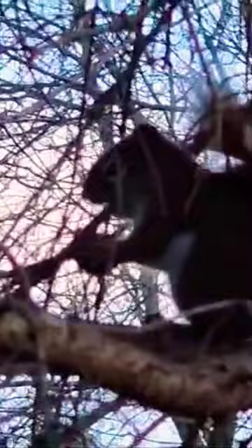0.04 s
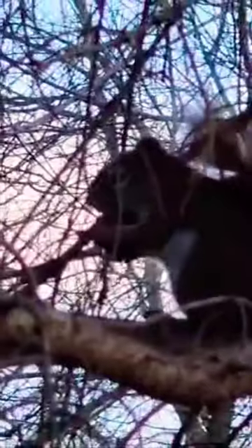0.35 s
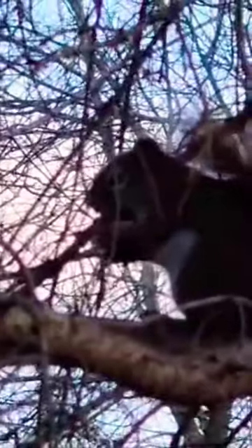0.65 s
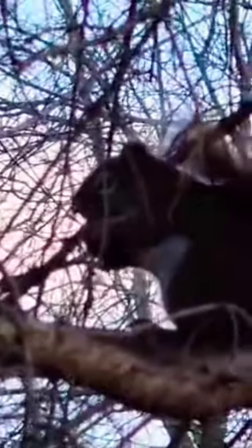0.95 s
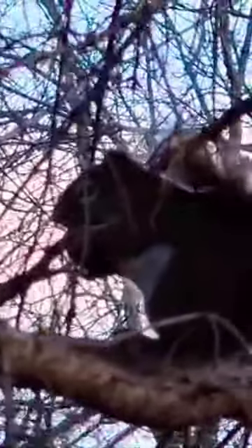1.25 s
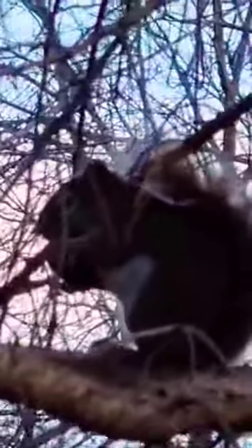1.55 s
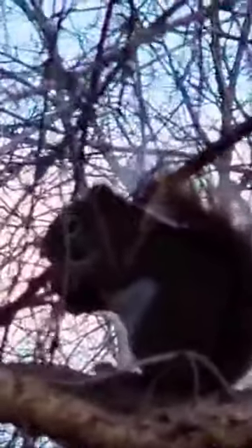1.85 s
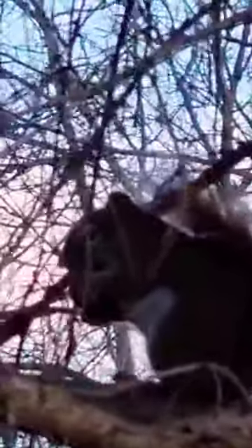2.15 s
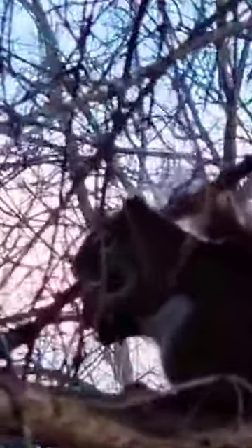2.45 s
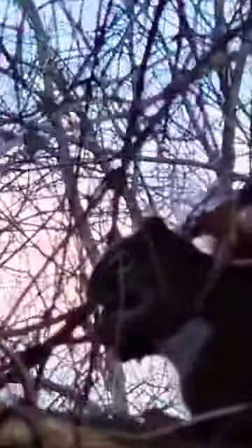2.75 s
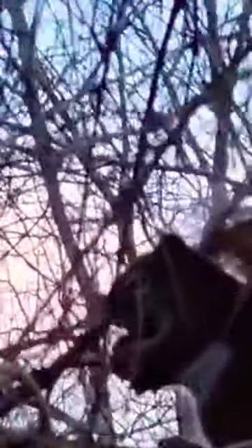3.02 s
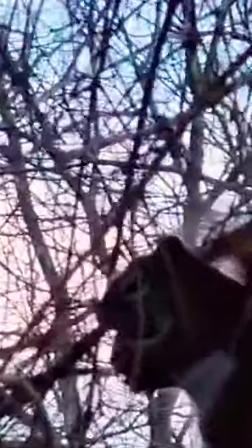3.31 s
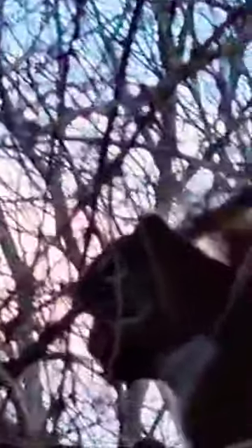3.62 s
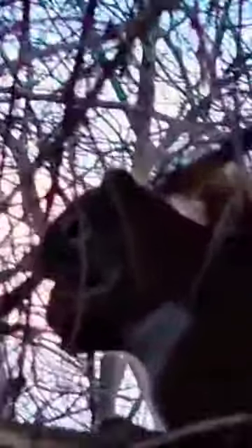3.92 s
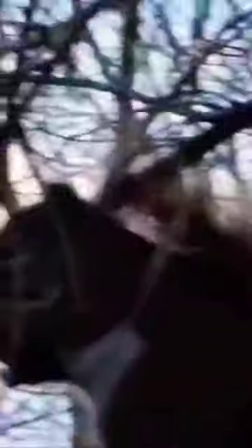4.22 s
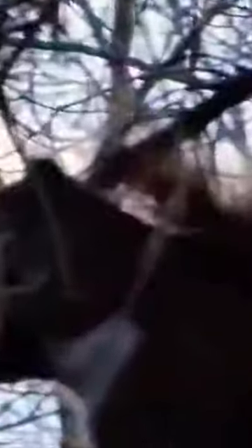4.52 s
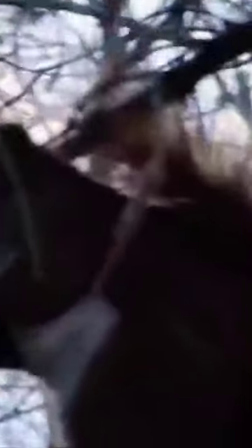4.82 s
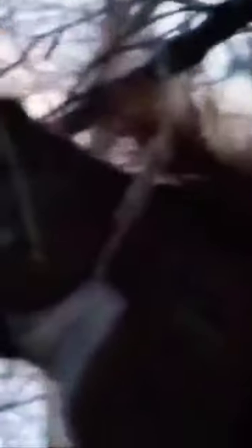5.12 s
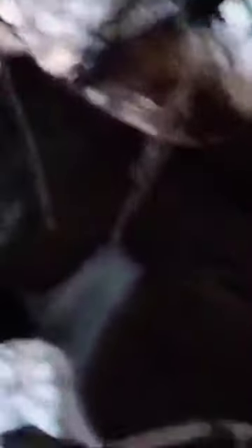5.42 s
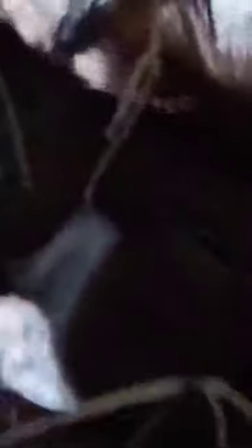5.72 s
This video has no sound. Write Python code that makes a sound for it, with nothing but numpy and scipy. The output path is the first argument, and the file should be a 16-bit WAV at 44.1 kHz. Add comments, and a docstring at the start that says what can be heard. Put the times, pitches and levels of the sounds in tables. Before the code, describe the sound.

Distant road traffic rumbles throughout, slightly to the left, slowly growing under a faint airy hiss. Off to the right, a small bird gives short, thin, high calls that echo among trees at about 0.5, 1.1 and 1.5 seconds; far birds tweet faintly. Close to the microphone, a squirrel gnaws a nut: a tick at 0.6 seconds, a dull knock at 1.2, then sharp, slightly hollow shell snaps with small tooth scrapes from 1.7 to 2.4, loudest around 2.1. The traffic swells between 2.5 and 3 seconds, with a faint sinking whine and drone. A soft scrape and slight rustle come near 3. The bird calls again at 3.4 and 3.8. From 4.5 to 5.5 seconds the squirrel gnaws in a denser run, about ten crisp rasping bites a second. The rumble swells briefly near 5.2, and a last bird call follows at 5.5.

```python
"""Far road traffic rumbles, slowly growing, with a few swells and a faint sinking whine and drone.
Over it a small bird repeats a thin call, two voices of its syrinx, that lingers among bare trees;
far birds tweet and the air hisses faintly. Close by, a squirrel gnaws a nut on a branch in two bouts:
its incisors scrape and catch on the shell and snap off chips, and the hollow nut rings."""
import sys
import numpy as np
from scipy import signal
from scipy.fft import rfft, irfft, next_fast_len
from scipy.io import wavfile

SR = 44100
rng = np.random.default_rng(int(sys.argv[2]) if len(sys.argv) > 2 else 0)


def dump_mix(stems):
    """Bounce the given channels to the path in sys.argv[1] as a 16-bit WAV at rate SR."""
    frames = np.atleast_2d(stems).T  # one column per channel
    limited = np.clip(frames, -1, 1)  # hard clip at full scale
    pcm = np.round(limited * 32767).astype(np.int16)
    wavfile.write(sys.argv[1], SR, pcm)


N = 258426
TIME_S = np.arange(N) / SR
N_FFT = next_fast_len(N + SR // 10, True)
BINS_HZ = np.fft.rfftfreq(N_FFT, 1 / SR)

# far sound at the two ears: freq_hz, coherence, left_lead_rad
EAR_COHERENCE = [(30, 0.86, 0), (90, 1, 0), (169, 0.98, 0.2), (340, 0.84, 0.68), (680, 0.3, 0.72),
                 (900, 0.7, 1.68), (1410, 0.5, 2), (2160, 0.2, 3.5), (5000, 0.15, -2)]
# air hiss: freq_hz, density_db
AIR_SPECTRUM = [(2000, -2), (4000, 3), (8500, -2.5), (10000, -9), (15500, -1.5), (17000, -25.5)]
# air hiss: time_s, level_db
AIR_LEVEL = [(0, -75.5), (1.6, -78), (2.6, -75.5), (3.1, -74.5), (3.6, -77.5), (4.4, -77.5), (5.6, -70)]
# thin rustle: freq_hz, density_db
RUSTLE_SPECTRUM = [(3000, -3.5), (7000, -7.5), (12000, -1.5), (15500, -1.5)]
# thin rustle: time_s, level_db
RUSTLE_LEVEL = [(2.4, -97), (2.75, -80), (2.93, -77), (3.0, -75), (3.12, -79.5), (3.6, -90)]

# engine rumble: freq_hz, density_db
RUMBLE_SPECTRUM = [(12, -57.5), (20, -20.5), (54, -9.5), (81, 0), (97, 2), (124, 0), (141, -6.5),
                   (166, -17), (201, -15), (260, -21), (340, -67), (570, -120)]
# tyre roar: freq_hz, density_db
ROAR_SPECTRUM = [(150, -18), (220, -5.5), (260, -4.5), (315, 2.5), (370, -1.5), (450, -1), (530, -5),
                 (620, -5), (750, -8.5), (950, -11), (1400, -30)]
# tyre hiss: freq_hz, density_db
HISS_SPECTRUM = [(600, -23), (900, 3), (1400, 2.5), (2000, -7), (3000, -17.5), (4500, -30), (7000, -47.5),
                 (10000, -36.5)]
# swells in the traffic's rumble, roar and hiss: peak_s, half_amplitude_s, rumble_db, roar_db, hiss_db
SWELLS = [(2.56, 0.2, -38, -42.5, -61), (2.88, 0.19, -29.5, -43.5, -59), (5.18, -0.08, -22.5, -53.5, -59),
          (5.82, 0.35, -38.5, -48.5, -53.5)]
# vehicle whine: time_s, level_db
WHINE_LEVEL = [(0, -65.5), (1.901, -61.5), (2.2, -54), (2.5, -51), (3.301, -61.5), (3.95, -52), (4.3, -62)]
# engine drone: time_s, level_db
DRONE_LEVEL = [(0, -64.5), (2.0, -62.5), (2.55, -47.5), (3.4, -48), (4.3, -48.5), (5.2, -49)]

# blurred far song dying away: time_s, level_db
FAR_SONG_LEVEL = [(0, -65), (.33, -65.5), (.55, -74), (1.0, -99)]
# blurred far song: freq_hz, density_db
FAR_SONG_SPECTRUM = [(1700, -9), (2200, -6), (2550, -7), (2850, -0.5), (3150, -11), (4000, -12.5)]
# one far bird's falling tweets: start_s, gain_db
TWEETS = [(0.791, -68), (1.04, -61), (1.292, -64), (1.805, -67), (2.068, -67), (2.585, -67.5), (4.675, -68),
          (5.18, -67)]
# another far bird's high notes: start_s, length_s, from_hz, to_hz, gain_db
HIGH_NOTES = [(.01, 0.05, 4630, 4900, -69), (.093, 0.026, 6350, 5660, -67.5),
              (.128, 0.017, 4410, 5550, -63), (.418, 0.021, 5150, 5430, -70),
              (1.821, 0.023, 4350, 5840, -62.5), (1.7, .012, 5160, 4480, -61)]
# small bird's calls: start_s, whistle_hz, whistle_db, accent_db, upsweep_db, chip_hz, chip_db
CALLS = [(0.539, 4196, -48.5, 11.5, -44, 5400, -57), (1.062, 3980, -53.5, 0.5, -66, 4590, -59.5),
         (1.479, 4050, -58, 3, -72, 4490, -57.5), (3.402, 3973, -53.5, -4, -60, 4700, -52.5),
         (3.459, 4194, -48.5, 11.5, -52, 5380, -65), (3.812, 4080, -55, 5.5, -69, 4490, -57.5),
         (5.536, 4020, -50.5, -2, -64, 4390, -54)]
# voice that holds, then drops: call_fraction, whistle_pitch_ratio, gain_db
WHISTLE = [(.1, .56, -24), (.2, .85, -16), (.27, 1, -6), (.33, 1.014, -1), (.42, .997, 0), (.58, .997, 0),
           (.68, .985, -2), (.74, .94, -10), (.78, .87, -11), (.84, .83, -11), (.88, .67, -13),
           (.93, .57, -6.5), (1, .53, -15)]
# voice that sweeps up: call_fraction, whistle_pitch_ratio, gain_db
UPSWEEP = [(0, .9, -30), (.09, 1.02, -12), (.16, 1.3, 0), (.22, 1.5, -12), (.28, 1.59, -12),
           (.38, 1.62, -11), (.58, 1.69, -18), (1, 1.69, -50)]
# the wood's echoes of a call: freq_hz, early_db, late_db
WOOD_RESPONSE = [(2400, 10.5, 0), (3000, 15, 9), (3650, 5, -2.5), (4230, 3, -3.5), (5500, -3, -12.5),
                 (7000, -2.5, -15)]

# modes of the scraped shell: freq_hz, width_hz, gain_db
SHELL_MODES = [(1490, 350, -3), (2250, 330, 2), (3480, 240, -4), (4700, 970, -6), (4750, 380, -3),
               (7800, 5100, -23)]
# tooth strokes and light paw rubs: middle_s, length_s, gain_db, rasp_fraction
STROKES = [(0.84, 0.019, -70, 0.6), (1.249, 0.047, -59.5, 0.34), (1.71, 0.036, -56, 0.4),
           (1.857, .02, -55.5, 0.3), (1.979, 0.016, -63, 0.75), (2.112, 0.047, -55.5, 0.6),
           (2.218, 0.039, -55.5, 0.88), (2.323, 0.039, -58, 0.64), (2.438, 0.029, -62, 0.45),
           (2.993, 0.083, -64, 0.67), (4.531, 0.059, -53.5, 0.46), (4.619, .03, -58, 0.8),
           (4.719, 0.026, -55, 0.84), (4.809, 0.028, -55, 0.64), (4.921, 0.033, -51, 0.5),
           (5.029, 0.039, -56.5, 0.88), (5.224, 0.039, -54, 0.18), (5.327, 0.047, -56.5, 0.32),
           (5.418, 0.041, -55.5, 0.94), (5.448, 0.017, -58, 0.5)]
# an incisor catches and slips: start_s, peak_db
CATCHES = [(.637, -48), (2.099, -48), (2.103, -46), (2.3108, -46.5), (2.316, -40), (4.5035, -47),
           (4.6115, -45), (4.721, -43), (4.803, -46), (4.9052, -42), (5.0203, -48), (5.0227, -41.5),
           (5.0345, -45), (5.0385, -41), (5.206, -49), (5.2218, -38), (5.4108, -40), (5.4168, -50),
           (5.4216, -44), (5.4267, -41)]
# nut knocks on the teeth: time_s, gain_db
KNOCKS = [(1.2024, -33)]
# shell fractures: start_s, gain_db, chip_hz, hollow_hz, hollow_db, overtone_db, edge_db
SNAPS = [(1.713, -21.5, 4600, 2920, 1, -15, -16), (1.8659, -22.5, 3830, 2630, 1.5, -10.5, -15),
         (1.8664, -29, 5200, 2440, -1, -9, -11), (2.115, -18, 4700, 2930, -12.5, -6, -13),
         (1.243, -44, 6260, 2200, -8, -3.5, -25.5), (2.214, -48.5, 4200, 2270, 0, -14, -29),
         (2.231, -38.5, 4840, 2250, -3.5, -11, -23), (2.333, -23.5, 4700, 3540, -15, -12, -28.5),
         (2.437, -37, 4520, 2290, -6, -5, -16.5), (2.966, -46, 4370, 3430, -10.5, -20, -26),
         (4.5157, -40, 4550, 2160, -1, -6.5, -13), (4.53, -29.5, 4470, 2150, -10, -1.5, -17),
         (4.5367, -31.5, 4685, 2150, -13.5, -3, -19), (4.5554, -28, 4770, 3500, -14, -11, -17.5),
         (4.6293, -39, 4705, 2100, -7, -19, -20), (4.7141, -47, 4860, 2080, 4, -19, -27.5),
         (4.72, -46, 4910, 2097, -1, -11, -19), (4.8067, -47, 4400, 2050, -4, -2.5, -18),
         (4.8137, -38, 4410, 2050, -4, -4.5, -20), (4.9099, -40, 4400, 2080, 3.5, -18, -29),
         (4.9182, -31.5, 4540, 2100, -5, -2, -9.5), (4.924, -40, 4500, 2100, -8, -4, -11),
         (5.145, -54, 4720, 2100, -7, -18, -26), (5.2192, -28.5, 5200, 2706, -7, 1, -12.5),
         (5.225, -32.5, 4930, 2720, -2, -8, -15), (5.316, -36.5, 4350, 2000, -1, -6, -15),
         (5.3282, -28.5, 4470, 2020, 2, -8, -19), (5.3325, -40, 4230, 2000, 3, -12, -21),
         (5.4539, -30.5, 6250, 2200, -11, -10, -27)]
# phase between the ears for the nut: freq_hz, left_lead_rad
NUT_LEAD = [(1000, .1), (4500, 0.5), (6500, 1.6), (7800, 2.5), (9300, 5.1), (10200, 2.6), (15000, 6.3)]
# scatter off the twigs: freq_hz, gain_db
TWIG_RESPONSE = [(1000, 13), (2000, 7.5), (2700, 7), (4800, -3.5), (6600, 2), (8400, .5), (11500, 3),
                 (14000, 3)]
# treble colour of each channel, a dip near 10 kHz and a dull top: freq_hz, left_db, right_db
TREBLE_COLOUR = [(1500, 0.5, 0.5), (2400, 1, -1.5), (4740, 0.9, 1.5), (6340, -1, -1), (8600, 3, -3.5),
                 (9900, -6, -7), (10400, -6, -4.5), (11000, -1.5, -1.5), (14800, -1.5, -1.5),
                 (16000, -10.5, -8.5)]


def from_db(db):
    """Decibels to gain."""
    return 10 ** (np.asarray(db) / 20)


def unit_rms(x):
    """Scale to rms 1."""
    return x / np.sqrt(np.mean(x ** 2) + 1e-20)


def unit_peak(x):
    """Scale to peak 1."""
    return x / np.abs(x).max()


def level_gain(curve):
    """Gain per sample from time_s, level_db rows."""
    return from_db(np.interp(TIME_S, *np.transpose(curve)))


def at_bins(curve, column=1):
    """One column at the FFT bins, interpolated in log frequency."""
    columns = np.transpose(curve)
    return np.interp(np.log(BINS_HZ + 1), np.log(columns[0]), columns[column])


def filtered(x, response):
    """Apply a real or complex gain per FFT bin."""
    return irfft(rfft(x, N_FFT) * response, N_FFT)[..., :N]


def coloured(x, curve, column=1):
    """Zero-phase filter from a dB curve."""
    return filtered(x, from_db(at_bins(curve, column)))


def resonance(x, hz, width_hz):
    """Two-pole resonator, peak gain 1."""
    radius = np.exp(-np.pi * width_hz / SR)
    feedback = [1, -2 * radius * np.cos(2 * np.pi * hz / SR), radius ** 2]
    return signal.lfilter(np.array([1, 0, -1]) * (1 - radius ** 2) / 2, feedback, x)


def band(x, low_hz, high_hz, order=2):
    """Causal band-pass."""
    return signal.sosfilt(signal.butter(order, [low_hz, high_hz], "band", fs=SR, output="sos"), x)


def band_noise(samples, low_hz, high_hz):
    """Band-passed noise, rms 1."""
    return unit_rms(band(rng.standard_normal(samples), low_hz, high_hz))


def add(track, start_s, sound):
    """Mix into a track in place."""
    i = max(int(start_s * SR), 0)
    track[i:i + len(sound)] += sound[:max(N - i, 0)]


def flutter(low_hz, high_hz, depth_db):
    """Gain wandering at random, at rates within the band."""
    wander = filtered(rng.standard_normal(N_FFT), (BINS_HZ > low_hz) & (BINS_HZ < high_hz))
    return unit_rms(from_db(depth_db * unit_rms(wander)))


def diffuse_noise(spectrum):
    """Stereo noise from far left: coherent bass, nearly unrelated treble; rms 1."""
    mid, side = rfft(rng.standard_normal((2, N_FFT)))
    coherence, lead_rad = at_bins(EAR_COHERENCE, 1), at_bins(EAR_COHERENCE, 2)
    ears = np.sqrt(1 + coherence) * mid + np.sqrt(1 - coherence) * side * [[1], [-1]]
    ears[1] *= np.exp(-1j * lead_rad)
    low_hz, high_hz = spectrum[0][0], spectrum[-1][0]
    skirts = 1 / (1 + (BINS_HZ / high_hz) ** 8) / (1 + (low_hz / (BINS_HZ + 1)) ** 4)
    return unit_rms(irfft(ears * from_db(at_bins(spectrum)) * skirts, N_FFT)[:, :N])


def scatter(x, t60_s, build_s, clumps_per_s, clump_db):
    """Dense clumped echoes off twigs and trunks, different at each ear; unit gain."""
    t = np.arange(SR) / SR
    clumps = np.interp(t * clumps_per_s, np.arange(1024), rng.standard_normal(1024).clip(-2, 2))
    envelope = from_db(clump_db * clumps - 60 * t / t60_s) * (1 - np.exp(-t / build_s))
    echoes = unit_rms(rng.standard_normal((2, SR)) * envelope) / np.sqrt(SR)
    return signal.fftconvolve(x[None], echoes, axes=1)[:, :N]


def air_hiss():
    """Faint high hiss; a grainy rustle swells once between the bouts."""
    rustle = level_gain(RUSTLE_LEVEL) * flutter(10, 300, depth_db=1.5) * diffuse_noise(RUSTLE_SPECTRUM)
    return level_gain(AIR_LEVEL) * diffuse_noise(AIR_SPECTRUM) + rustle


def road_gain(swells_db, start_db, rise_db_per_s):
    """Power sum of an ever busier road and brief swells."""
    power = from_db(start_db + rise_db_per_s * TIME_S) ** 2
    for (peak_s, width_s, *_), db in zip(SWELLS, swells_db):
        power += (from_db(db) / (1 + ((TIME_S - peak_s) / width_s) ** 2)) ** 2
    return np.sqrt(power)


def multipath_tone(hz, level, width_hz):
    """Far tone, smeared in level and pitch by its many paths."""
    phase = 2 * np.pi * np.cumsum(hz) / SR
    smear = [(.1, 0), (width_hz, -3), (3 * width_hz, -20)]   # offset_hz, density_db
    tone = diffuse_noise(smear) * np.sin(phase) + diffuse_noise(smear) * np.cos(phase)
    return level_gain(level) * tone


def traffic(whine_hz=631.5, whine_sag_hz_per_s=5.1, drone_hz=337.5, drone_sag_hz_per_s=13.6):
    """Engines rumble, tyres roar and hiss; one vehicle's whine sinks, its drone too as it slows."""
    _, _, rumble_db, roar_db, hiss_db = np.transpose(SWELLS)
    rumble_gain = road_gain(rumble_db, start_db=-32, rise_db_per_s=0.68)
    rumble = rumble_gain * flutter(3, 12, depth_db=0.87) * diffuse_noise(RUMBLE_SPECTRUM)
    roar = road_gain(roar_db, start_db=-51, rise_db_per_s=1.18) * diffuse_noise(ROAR_SPECTRUM)
    hiss = road_gain(hiss_db, start_db=-57, rise_db_per_s=0.42) * diffuse_noise(HISS_SPECTRUM)
    whine = multipath_tone(whine_hz - whine_sag_hz_per_s * TIME_S, WHINE_LEVEL, width_hz=5)
    slowing_s = np.maximum(TIME_S - 1.95, 0)
    drone = multipath_tone(drone_hz - drone_sag_hz_per_s * slowing_s, DRONE_LEVEL, width_hz=19)
    return rumble + roar + hiss + whine + drone


def glide(hz, db):
    """Sine on a pitch and level path, soft ends."""
    phase = 2 * np.pi * np.cumsum(hz) / SR
    return np.sqrt(2) * from_db(db) * np.sin(phase) * signal.windows.tukey(len(hz), .15)


def far_birds(tweet_s=0.019, tweet_hz=(3800, 3005)):
    """Notes from deep in the wood, mostly echo, over the blur of a fading song."""
    tweets = [(start_s, tweet_s, *tweet_hz, db) for start_s, db in TWEETS]
    notes = np.zeros(N)
    for start_s, length_s, from_hz, to_hz, db in HIGH_NOTES + tweets:
        hz = np.geomspace(from_hz, to_hz, int(length_s * SR))
        quaver = 1 + 0.03 * band_noise(len(hz), 80, 600)
        add(notes, start_s, glide(hz * quaver, db - 0.5))
    echoes = scatter(notes, t60_s=0.69, build_s=.003, clumps_per_s=59, clump_db=-4.5)
    song = level_gain(FAR_SONG_LEVEL) * diffuse_noise(FAR_SONG_SPECTRUM)
    return from_db(-5) * notes + from_db(-1.5) * echoes + song


def call_chip(hz, db, length_s, buzz_hz=330, buzz_depth=0.06, rise_ratio=.15):
    """Buzzy rising note that opens a call."""
    t = np.arange(int(length_s * SR)) / SR
    warble = np.sin(2 * np.pi * buzz_hz * t + rng.uniform(0, 2 * np.pi)) + band_noise(len(t), 90, 800)
    pitch_ratio = 1 + rise_ratio * (t / length_s - .5) + buzz_depth * warble
    return glide(hz * pitch_ratio, db) * signal.windows.tukey(len(t), .7)


def bird_calls(call_s=.092, chip_s=0.02, accent_ratio=.85, accent_width=0.061):
    """A chip, then one side of the syrinx sweeps up while the other holds a whistle and drops."""
    out = np.zeros(N)
    samples = int(call_s * SR)
    progress = np.linspace(0, 1, samples)
    for start_s, hz, whistle_db, accent_db, upsweep_db, chip_hz, chip_db in CALLS:
        add(out, start_s - chip_s / 4, call_chip(chip_hz, chip_db, chip_s))
        huskiness = band_noise(samples, 4500, 8300) * signal.windows.tukey(samples, .5)
        add(out, start_s, from_db(whistle_db - 23) * huskiness)
        for voice, db, roughness in ((WHISTLE, whistle_db, .007), (UPSWEEP, upsweep_db, 0.015)):
            fractions, ratios, gains_db = np.transpose(voice)
            ratio = np.interp(progress, fractions, ratios)
            shape_db = np.interp(progress, fractions, gains_db)
            quaver = 1 + roughness * band_noise(samples, 40, 500)
            accent = np.exp(-((ratio - accent_ratio) / accent_width) ** 2)
            add(out, start_s, glide(hz * ratio * quaver, db + shape_db + accent_db * accent))
    return out


def small_bird(pan_db=6.0):
    """Caller off to the right: branches blur it, the wood carries it on, lower notes most."""
    calls = bird_calls()
    direct = calls * from_db([[-pan_db], [pan_db]])
    blur = scatter(calls, t60_s=.09, build_s=.002, clumps_per_s=400, clump_db=4)
    early_feed, late_feed = coloured(calls, WOOD_RESPONSE, 1), coloured(calls, WOOD_RESPONSE, 2)
    early = scatter(early_feed, t60_s=.5, build_s=.005, clumps_per_s=200, clump_db=3)
    late = scatter(late_feed, t60_s=2.0, build_s=.012, clumps_per_s=25, clump_db=1.2)
    return from_db(-5) * direct + from_db(-12) * blur + from_db(-7) * early + from_db(-8.5) * late


def fracture(crumble_db, crumble_s):
    """Force of a break: one sharp release, then fibres tearing."""
    t = np.arange(1024) / SR
    force = from_db(crumble_db) * rng.standard_normal(len(t)) * np.exp(-t / crumble_s)
    force[0] = 1
    return force


def shell_ring(force, pitch_ratio, spot_db):
    """Shell modes, shifted and weighted by where the teeth touch."""
    return sum((-1) ** k * from_db(db + spot_db[k]) * resonance(force, hz * pitch_ratio, width_hz)
               for k, (hz, width_hz, db) in enumerate(SHELL_MODES))


def scrapes(slip_gap_s=.0042, uneven_db=4.0, grit_db=-21, pitch_spread=0.11):
    """Incisors chatter over the shell in tiny tears; each stroke mixes low rasp and bright crackle."""
    out = np.zeros(N)
    for middle_s, length_s, db, rasp_fraction in STROKES:
        t = np.arange(int(2 * length_s * SR)) / SR
        pressure = np.sin(np.pi * np.minimum(t / length_s, 1)).clip(0)
        grit = from_db(grit_db) * rng.standard_normal(len(t)) * pressure
        # paws turn the nut: each stroke favours other modes
        grip_ratio = rng.uniform(.94, 1.06)
        spot_db = rng.normal(0, 2.8, len(SHELL_MODES))
        slips_s = np.cumsum(slip_gap_s * rng.uniform(.55, 1.45, 40))
        ring = np.zeros(N)
        for slip_s in slips_s[slips_s < length_s]:
            tear = fracture(crumble_db=-13.5, crumble_s=0.00062)
            tear *= pressure[int(slip_s * SR)] * from_db(uneven_db * rng.normal())
            pitch_ratio = grip_ratio * (1 + pitch_spread * rng.uniform(-0.58, 1))
            add(ring, slip_s, shell_ring(tear, pitch_ratio, spot_db))
        ring = ring[:len(t)] + shell_ring(grit, grip_ratio, spot_db)
        rasp = np.sqrt(rasp_fraction) * unit_rms(band(ring, 1100, 6000, order=4))
        crackle = np.sqrt(1 - rasp_fraction) * unit_rms(band(ring, 5800, 9800, order=3))
        add(out, middle_s - length_s / 2, from_db(db - 6.5) * (rasp + crackle))
    return out


def catches():
    """A slipping tooth rings the shell briefly, each tick at a slightly different pitch."""
    out = np.zeros(N)
    for start_s, db in CATCHES:
        force = fracture(crumble_db=-19.5, crumble_s=0.00086)
        pitch_ratio = rng.uniform(.94, 1.06)
        shell = resonance(force, 4450 * pitch_ratio, width_hz=1300)
        hollow = from_db(-1) * resonance(force, 2200 * pitch_ratio, width_hz=600)
        add(out, start_s, from_db(db) * unit_peak(band(shell + hollow, 1600, 8000)))
    return out


def knocks(lag_s=0.00083):
    """The nut knocks dully against the teeth."""
    out = np.zeros(N)
    for time_s, db in KNOCKS:
        knock = band(fracture(crumble_db=-8.5, crumble_s=0.0015), 970, 4400, order=3)
        add(out, time_s + lag_s, from_db(db + 3) * unit_peak(knock))
    return out


def snaps():
    """The shell breaks: a chip rings with a glassy overtone and sharp edge; the hollow nut answers."""
    out = np.zeros(N)
    for start_s, db, chip_hz, hollow_hz, hollow_db, overtone_db, edge_db in SNAPS:
        force = fracture(crumble_db=-20, crumble_s=0.0013)
        chip = band(resonance(force, chip_hz, width_hz=1800), 2620, 6900, order=3)
        hollow = from_db(hollow_db) * resonance(band(force, 890, 5000), hollow_hz, width_hz=380)
        overtone_hz = 7900 * rng.uniform(0.75, 1.09)
        overtone = from_db(overtone_db) * resonance(band(force, 6600, 10440), overtone_hz, width_hz=2200)
        edge = from_db(edge_db) * band(force, 3200, 14000)
        add(out, start_s, from_db(db + 3) * unit_peak(chip + hollow + overtone + edge))
    return out


def squirrel(echo_s=0.011, pan_db=0.9):
    """Close gnawing, one distinct reflection, scatter off the twigs and the duller wood beyond."""
    nut = snaps() + knocks() + catches() + scrapes()
    right = filtered(nut, np.exp(-1j * at_bins(NUT_LEAD)))
    direct = np.array([nut * from_db(-pan_db), right * from_db(pan_db)])
    echo = filtered(direct, np.exp(-2j * np.pi * BINS_HZ * echo_s))
    twig_feed = coloured(nut, TWIG_RESPONSE)
    wood_feed = band(twig_feed, 900, 8000, order=1)
    twigs = scatter(twig_feed, t60_s=0.11, build_s=0.0032, clumps_per_s=1500, clump_db=2.5)
    wood = scatter(wood_feed, t60_s=0.7, build_s=0.011, clumps_per_s=42, clump_db=2.0)
    return direct + from_db(-15) * echo + from_db(-7.5) * twigs + from_db(-20) * wood


def scene():
    """Stereo sum of all sources."""
    return squirrel() + small_bird() + far_birds() + traffic() + air_hiss()


def record(dry, cutoff_hz=16000):
    """Short end fades; each channel's treble dips near 10 kHz and dulls on top; steep low-pass."""
    left, right = dry * signal.windows.tukey(N, .003)
    channels = np.array([coloured(left, TREBLE_COLOUR, 1), coloured(right, TREBLE_COLOUR, 2)])
    return signal.sosfilt(signal.ellip(10, .1, 80, cutoff_hz, fs=SR, output="sos"), channels)


dry = scene()
out = record(dry)
dump_mix(out)
```